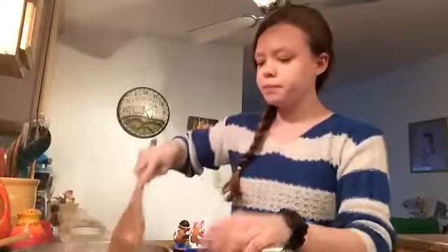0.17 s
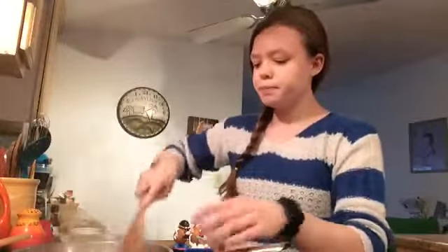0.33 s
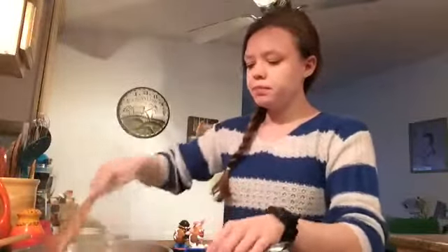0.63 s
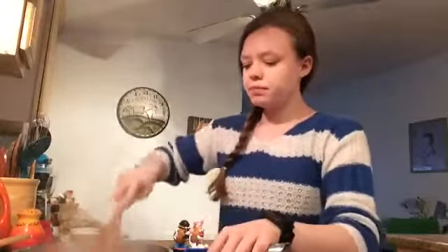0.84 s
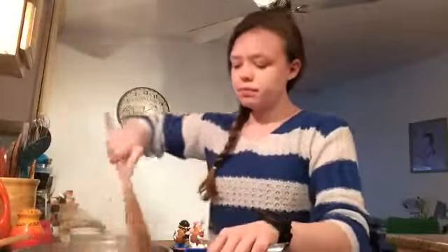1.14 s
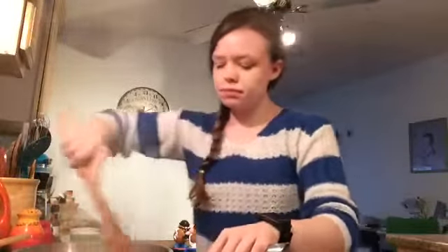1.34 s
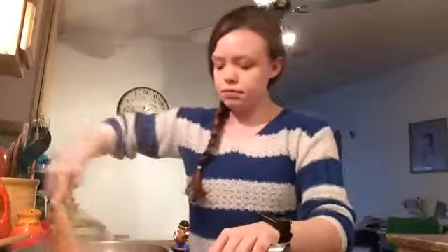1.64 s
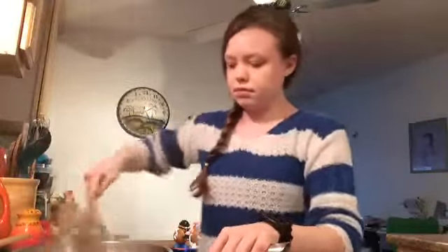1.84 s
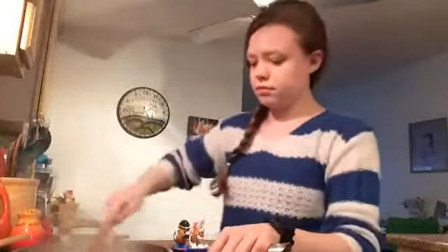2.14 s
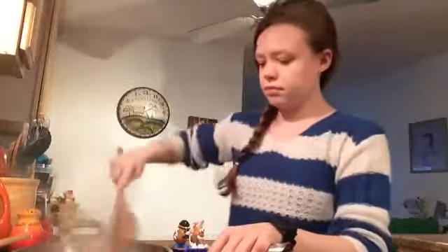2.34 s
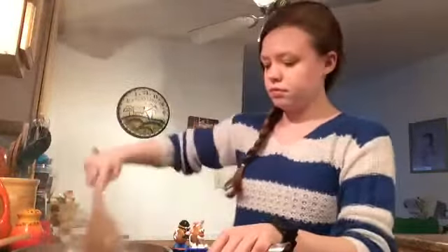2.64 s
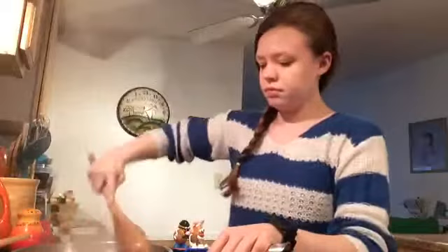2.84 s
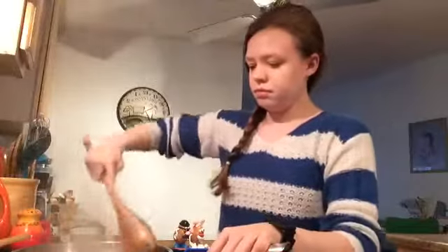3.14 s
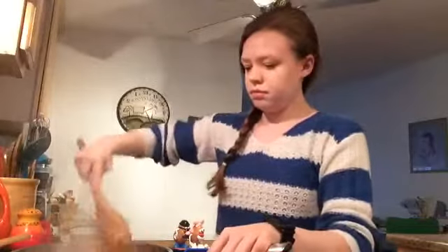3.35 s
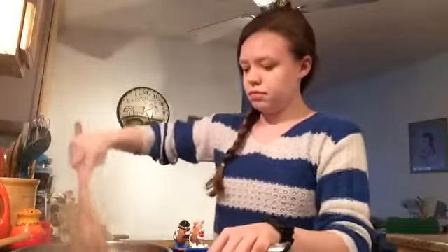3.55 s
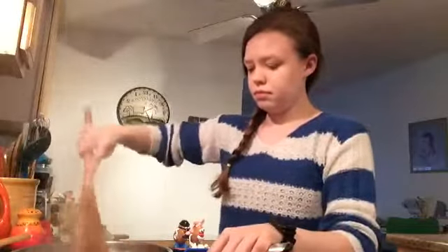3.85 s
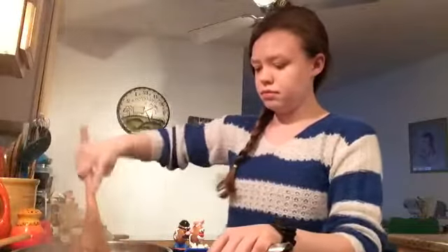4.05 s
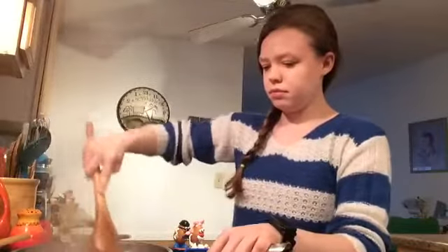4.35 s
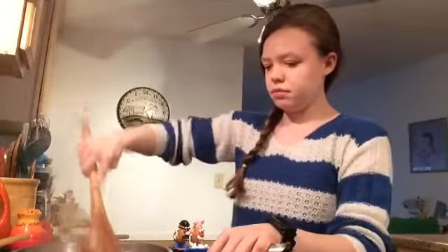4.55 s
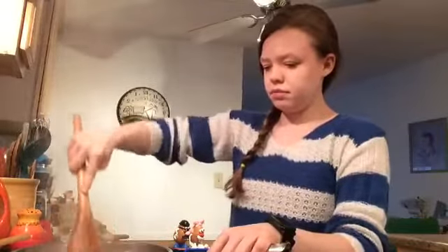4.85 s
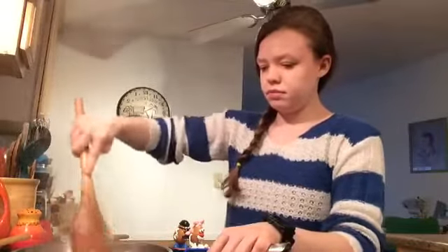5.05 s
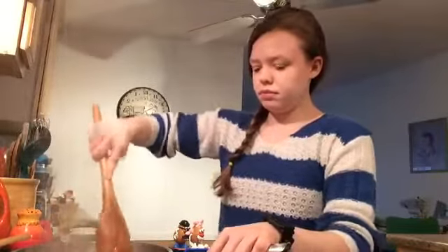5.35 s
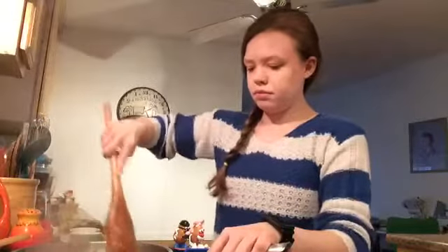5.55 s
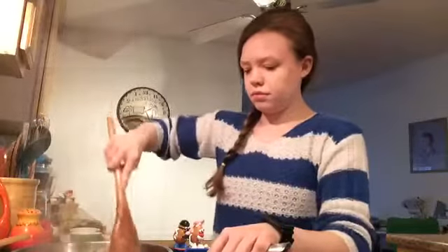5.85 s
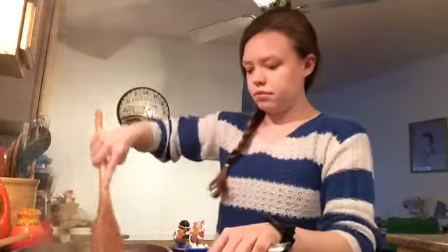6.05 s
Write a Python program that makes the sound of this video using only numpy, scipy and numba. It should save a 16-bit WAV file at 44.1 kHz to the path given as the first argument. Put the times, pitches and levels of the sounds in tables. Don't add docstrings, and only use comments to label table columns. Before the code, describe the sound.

Irregular wooden clacks on a damped metal pan, moist meat being pushed around, a short scraping squeak midway, and a soft kitchen fan throughout.

```python
import sys
import numpy as np
from scipy import signal
from scipy.fft import rfft, irfft, next_fast_len
from scipy.io import wavfile
from scipy.ndimage import uniform_filter1d
from numba import njit

SR = 44100
rng = np.random.default_rng(int(sys.argv[2]) if len(sys.argv) > 2 else 0)


def undo_db(level):
    steps = np.asarray(level, float) / 20
    return 10 ** steps


def dump(signal):
    limited = np.clip(np.atleast_2d(signal).T, -1, 1)
    pcm = np.round(limited * 32767).astype(np.int16)
    wavfile.write(sys.argv[1], SR, pcm)


N = 274169
TIME = np.arange(N) / SR

# f/Hz, density level/dB
FAN_SPECTRUM = [(30, -55), (85, -35), (125, -3), (200, -4.5), (300, -8.5), (520, -10.5), (700, -9.5),
                (1440, -9), (1920, -15), (4000, -18.5), (7300, -20.5), (10000, -21), (13000, -29.5),
                (15600, -33)]
# f/Hz, level/dB, T60/s
ROOM_BANDS = [(200, -8.5, 0.33), (500, -13, 0.3), (1200, -14, 0.24), (2530, -9, 0.32), (6000, -16, 0.5)]
# centre t/s, level/dB, f/Hz, length/s, glide ratio/1
CHIRPS = [(0.011, -53, 1536, 0.039, 1.0), (.012, -53, 900, 0.043, 1.06), (.79, -47, 591, 0.039, 1.0),
          (.792, -47, 2480, 0.01, 1.0), (.815, -58, 2500, .014, 1.16), (2.037, -55.5, 3250, 0.0074, 1.0),
          (3.547, -50.5, 2605, 0.029, 1.0), (3.975, -54, 1390, 0.014, 0.99), (4.006, -55, 1300, .01, 1.05),
          (4.018, -52, 1480, 0.014, 1.1), (4.028, -53, 1760, 0.017, 1.01), (3.44, -55, 2475, .05, 1.1),
          (3.5, -57, 3300, .04, 1.02), (3.64, -57, 2760, .06, 1.05), (4.267, -44, 1223, 0.012, 0.97),
          (5.503, -54, 1050, .012, 1.0), (5.57, -57, 950, .012, 1.0), (5.655, -56, 1250, .014, 1.0),
          (5.67, -56, 1700, .012, 1.0), (4.336, -47, 1138, 0.019, 1.16), (6.21, -59, 990, 0.014, 1.0)]
# centre t/s, level/dB, f/Hz, bandwidth/Hz, length/s
RASPS = [(.02, -64.5, 4700, 900, 0.073), (0.357, -58.5, 1530, 350, 0.082), (0.797, -70, 11800, 6000, 0.053),
         (3.472, -53.5, 3000, 4000, .1), (3.6, -58, 3170, 1800, .13), (5.51, -62, 400, 300, .04),
         (2.3, -64, 1300, 900, .06), (3.96, -66, 9000, 8000, 0.085), (4.04, -61.5, 3760, 600, 0.13),
         (4.153, -58.5, 4420, 800, 0.097), (4.295, -55.5, 4650, 900, 0.09), (4.559, -56.5, 3566, 900, .07),
         (5.095, -59.5, 2940, 2000, .03), (5.175, -71, 4600, 700, .06), (5.5, -60, 1400, 1800, 0.0124),
         (5.678, -66, 1400, 600, 0.0714), (4.948, -66, 7600, 800, .05), (3.162, -63, 4600, 900, 0.078)]
# t/s, slip rate f/Hz, level/dB
SQUEAK_STRANDS = [
    [(3.6, 880, -13), (3.635, 915, -7), (3.66, 935, -8), (3.71, 945, -13)],
    [(3.7, 990, -8), (3.715, 1000, -3), (3.735, 1018, -5), (3.755, 1004, 0), (3.8, 1012, -1),
     (3.86, 1006, -7), (3.89, 1000, -4), (3.93, 966, -3), (3.965, 950, -12)],
    [(3.79, 1062, -10), (3.815, 1083, 1), (3.845, 1084, 0), (3.885, 1096, -4), (3.915, 1075, -11)],
]
# f/Hz, level/dB
EDGE_RESPONSE = [(1000, -19), (2100, -12), (3100, -9), (4200, -2), (5200, -9.5), (6200, -9), (7200, -18),
                 (9000, -16.5), (11000, -31), (14000, -36)]
# t/s, hiss level/dB, drag level/dB, time to fall 20 dB/s
PLUNGES = [
    (0.0, -62.5, -55, 0.23),
    (.246, -51.5, -47.5, 0.06),
    (2.39, -65.5, -59.5, 0.43),
    (3.05, -62.5, -56, 0.47),
    (3.413, -52, -53, 0.3),
    (4.24, -56.5, -54.5, .24),
    (4.517, -55, -53, .17),
    (4.782, -46, -47, .15),
    (5.08, -62, -54.5, .12),
    (5.8, -54.5, -50, 0.11),
]
# centre t/s, hiss level/dB, drag level/dB, length/s
PUSHES = [(.35, -65, -59, 0.17), (.66, -66.5, -69, .1), (0.743, -71, -59, 0.082), (.797, -59, -57, 0.082),
          (1.517, -68.5, -69, .14), (1.332, -69.5, -67, 0.31), (1.676, -67, -64.5, 0.19),
          (1.895, -69, -70.5, .1), (2.06, -64.5, -61.5, .24), (2.854, -67.5, -59, .12),
          (2.977, -67, -67, 0.12), (3.152, -57.5, -62, .14), (3.483, -60, -53, .1),
          (3.59, -70, -56.5, 0.21), (3.78, -70, -73, .3), (4.0, -59.5, -68, 0.21), (4.17, -63, -68, 0.19),
          (4.7, -69, -70.5, 0.19), (5.184, -65.5, -64.5, 0.18), (4.98, -67, -72, 0.14),
          (5.25, -67, -64, .14), (5.42, -66.5, -70, .3), (5.643, -62, -56, 0.21), (6.053, -62, -57.5, 0.12)]
# f/Hz, density level/dB
SQUELCH_SPECTRUM = [(300, -21), (1000, -8), (2500, -1), (5000, -2.5), (8000, -4), (10500, -11.5),
                    (12500, -17.5), (15500, -30)]
# f/Hz, density level/dB
DRAG_SPECTRUM = [(100, -9.5), (250, -4.5), (600, -3), (900, 0), (1500, -2.5), (2200, -11.5), (3500, -18),
                 (7000, -47), (15500, -70)]
# t/s, peak level/dB, spoon f/Hz, thud f/Hz, treble level/dB
KNOCKS = [(.269, -31, 730, 411, -13.5), (.666, -54, 210, 190, -10), (1.284, -57, 500, 200, -18),
          (1.307, -45.5, 500, 422, -27), (1.317, -48, 500, 254, -25), (1.962, -38.5, 700, 290, -16),
          (2.413, -30, 834, 296, -16.5), (2.807, -34, 596, 263, -34), (3.103, -22.5, 1100, 429, -9.5),
          (3.5661, -19.5, 1360, 252, -13.5), (3.948, -35, 900, 250, -11), (4.532, -40, 532, 210, -14),
          (4.8173, -16, 814, 320, -6.5), (5.374, -30, 1200, 378, -27), (5.588, -35.5, 1200, 320, -8),
          (5.8151, -13.5, 1400, 290, -10), (6.042, -53, 1150, 260, 2.5)]
# f/Hz, level/dB, T60/s
PAN_MODES = [(188, -5.5, 0.48), (270.3, -2, .1), (320, -3.5, 0.18), (423.5, -2, 0.055), (564, -18, 0.18),
             (722, -10, 0.1), (845, -6.5, 0.033), (958.5, -24, 0.051), (1187, -3, 0.026), (1430, -4, 0.032),
             (1600, -12.5, 0.039), (1748, 0, 0.026), (1803, -11, 0.0333), (2105, -14.5, 0.06),
             (2290, -34, 0.095), (2440, -16, 0.039), (2716, -22, 0.062), (3120, -23, 0.023)]
# t/s, f/Hz, level/dB, T60/s
FREE_RINGS = [(3.103, 188, -30, 0.18), (3.103, 427, -21.5, .085), (4.819, 199, -29, 0.11),
              (4.817, 285, -30, .07), (5.815, 188, -35, 0.16), (2.807, 180, -37, 0.16),
              (5.375, 300, -37, .08), (3.949, 200, -44, .12), (3.568, 330, -33, .09),
              (5.816, 2050, -30, .04), (.667, 173, -48, 0.11), (3.103, 560, -35, .1),
              (3.108, 721, -26, 0.12), (3.104, 1550, -32, .06), (3.103, 380, -30, .06),
              (3.103, 280, -29, .14), (3.104, 1180, -29, 0.045), (3.103, 2764, -39, 0.065),
              (4.818, 764, -27, 0.045), (4.817, 2440, -32, 0.025), (5.815, 2950, -36, .02),
              (5.374, 760, -36, .025), (5.588, 800, -44, .03), (5.82, 1600, -36, 0.15),
              (5.82, 851, -42, 0.15), (2.414, 1850, -44, 0.02)]
# f/Hz, level/dB, T60/s
HOB_MODE = (140, -17, .12)
# level/dB, T60/s at 200 Hz, T60/s at 3 kHz
SHUDDER_DECAY = (-20, 0.12, 0.04)

FAN_DB, HUM_HZ, HUM_DB = -63.5, 121.3, -74.5
WALL_S, WALL_DB = .021, -12
ROOM_BUILD_S = .012
SQUEAK_DB = -53
PLUNGE_ATTACK_S = 0.0041
REST_HISS_DB, REST_DRAG_DB = -72, -69
SQUELCH_HZ, SQUELCH_SAG_HZ_PER_DB = 4000, 31
CONTACT_S = .00025
THUD_SAG, THUD_SAG_S = .2, .006
DAMPED_T60_S = .06
MID_KNOCK_DB, MID_KNOCK_HZ = -35, 800
THUD_DB, THUD_PER_DB, THUD_DB_PER_OCTAVE = -4.5, -.5, -4
MID_DB, MID_DB_PER_OCTAVE = -4.5, -8


def level(x, db):
    return x * undo_db(db) / np.sqrt(np.mean(x ** 2))


def colour(x, points):
    hz, db = np.transpose(points)
    n = next_fast_len(len(x))
    log_hz = np.log(np.fft.rfftfreq(n, 1 / SR) + 1)
    gain = undo_db(np.interp(log_hz, np.log(hz), db))
    return irfft(rfft(x, n) * gain, n)[:len(x)]


def walk(rate):
    hold = int(SR / rate)
    steps = np.repeat(rng.standard_normal(N // hold + 1), hold)
    return 1.23 * uniform_filter1d(uniform_filter1d(steps, hold), hold)[:N]


def curve(table):
    s, *columns = np.transpose(table)
    return [np.interp(TIME, s, c) for c in columns]


def grains(rate, spread_db):
    size = undo_db(spread_db * np.minimum(rng.exponential(size=N), 3))
    pops = (rng.random(N) < rate / SR) * size
    return rng.standard_normal(N) * (1 + signal.lfilter([1], [1, -.95], pops))


@njit
def svf(x, hz, width):
    y, b, l = np.empty(len(x)), 0., 0.
    for i in range(len(x)):
        g, k = np.tan(np.pi * hz[i] / SR), width[i] / hz[i]
        v = (b + g * (x[i] - l)) / (1 + g * (g + k))
        b, l, y[i] = 2 * v - b, l + 2 * g * v, k * v
    return y


def ring(t, hz, t60):
    return np.sin(2 * np.pi * hz * t) * np.exp(-np.log(1000) * t / t60)


def around(s, length):
    return slice(max(int((s - 2 * length) * SR), 0), int((s + 2 * length) * SR))


def kitchen():
    rush = level(colour(grains(300, 1.5), FAN_SPECTRUM), FAN_DB - 3) * undo_db(.7 * walk(3))
    hum = np.sqrt(2) * undo_db(HUM_DB + 0.9 * walk(2.5)) * np.sin(2 * np.pi * HUM_HZ * TIME)
    return rush + hum


def room(x):
    t = np.arange(SR // 2) / SR
    tail, echoes = np.zeros(len(t)), rng.standard_normal(len(t))
    for size in (512, 256, 512, 256):
        cells = signal.stft(echoes, nperseg=size)[2]
        echoes = signal.istft(cells / np.abs(cells), nperseg=size)[1][:len(t)]
    build = 1 - np.exp(-(t / ROOM_BUILD_S) ** 2)
    for hz, db, t60 in ROOM_BANDS:
        band = svf(echoes, hz + 0 * t, hz + 0 * t) * np.exp(-np.log(1000) * t / t60) * build
        tail += undo_db(db) * band / np.sqrt(np.sum(band ** 2)) * np.sqrt(3 * hz / SR)
    tail[0] = 1
    tail[int(WALL_S * SR)] += undo_db(WALL_DB)
    return signal.fftconvolve(x, tail)[:N]


def rasps():
    out = np.zeros(N)
    for s, db, hz, width, length in RASPS:
        near = around(s, length)
        u = (TIME[near] - s) / length
        centre, span = hz + 0 * u, width + 0 * u
        band = svf(svf(rng.standard_normal(len(u)), centre, span), centre, span)
        out[near] += level(band, db) * np.exp(-4 * u ** 2)
    return out


def chirps():
    out, waver = np.zeros(N), undo_db(1.5 * walk(200))
    for s, db, hz, length, glide in CHIRPS:
        near = around(s, length)
        u = (TIME[near] - s) / length
        cycles = hz * length * (u + (glide - 1) * u ** 2 / 2)
        out[near] += undo_db(db) * np.exp(-4 * u ** 2) * np.sin(2 * np.pi * cycles)
    return out * waver


def squeak():
    out, (edge_hz, edge_db) = np.zeros(N), np.transpose(EDGE_RESPONSE)
    for strand in SQUEAK_STRANDS:
        on = slice(int(strand[0][0] * SR), int(strand[-1][0] * SR))
        hz, db = (c[on] for c in curve(strand))
        phase = np.cumsum(hz * (1 + .01 * walk(400)[on])) / SR
        fade = signal.windows.tukey(len(hz), .15)
        for k in range(1, 14):
            grip_db = 3 * uniform_filter1d(rng.standard_normal(len(hz)), 300) * np.sqrt(300)
            harmonic_db = SQUEAK_DB + db + np.interp(k * hz, edge_hz, edge_db) + grip_db
            out[on] += undo_db(harmonic_db) * np.cos(2 * np.pi * k * phase) * fade
    return out


def strokes():
    gain = undo_db(np.array([[REST_HISS_DB], [REST_DRAG_DB]])) + 0 * TIME
    for s, hiss_db, drag_db, fall in PLUNGES:
        u = np.maximum(TIME - s, 0)
        decay = undo_db(np.array([[hiss_db], [drag_db]]) - 20 * u / fall)
        gain = np.hypot(gain, decay * (1 - np.exp(-u / PLUNGE_ATTACK_S)))
    for s, hiss_db, drag_db, length in PUSHES:
        swell = np.exp(-4 * ((TIME - s) / length) ** 2)
        gain = np.hypot(gain, undo_db(np.array([[hiss_db], [drag_db]])) * swell)
    return gain


def stirring():
    hiss, pull = strokes()
    wet = grains(900, 0.66)
    pull_db = 20 * np.log10(pull) - REST_DRAG_DB
    centre_hz = np.clip(SQUELCH_HZ - SQUELCH_SAG_HZ_PER_DB * pull_db, 1500, 9000)
    resonance = level(svf(wet, centre_hz, centre_hz / 2.6), 0)
    squelch = level(colour(wet, SQUELCH_SPECTRUM), 0) + 0.23 * resonance
    drag = level(colour(grains(300, 2.0), DRAG_SPECTRUM), -0.48)
    return level(squelch, -0.77) * hiss * undo_db(2.0 * walk(30)) + drag * pull * undo_db(1.92 * walk(24.96))


def shudder(t, thud_db, mid_db, treble_db, count=120):
    place = (np.arange(count)[:, None] + rng.random((count, 1))) / count
    hz = 150 * 2 ** (4.6 * place)
    levels_db = [thud_db, mid_db, treble_db, treble_db - 11.5]
    tilt_db = np.interp(np.log(hz), np.log([350, 800, 1800, 3600]), levels_db)
    t60 = np.interp(np.log(hz), np.log([200, 3000]), SHUDDER_DECAY[1:])
    strength = rng.standard_normal((count, 1)) * undo_db(SHUDDER_DECAY[0] + tilt_db)
    return np.sum(strength * ring(t, hz, t60), axis=0)


def knocks():
    out, t = np.zeros(N + SR), np.arange(SR // 5) / SR
    hz, db, t60 = np.transpose(PAN_MODES)[:, :, None]
    damped_t60 = np.minimum(t60, DAMPED_T60_S)
    chance = rng.standard_normal((len(KNOCKS), 2, len(PAN_MODES), 1))
    hob_hz, hob_db, hob_t60 = HOB_MODE
    hob = undo_db(hob_db) * ring(t, hob_hz, hob_t60) * (1 - np.exp(-t / 0.003))
    sagging_t = t + THUD_SAG * THUD_SAG_S * (1 - np.exp(-t / THUD_SAG_S))
    contact = 1 - np.exp(-(t / CONTACT_S) ** 2)
    for (s, peak_db, wood_hz, thud_hz, treble_db), (place, detune) in zip(KNOCKS, chance):
        octaves = np.log2(wood_hz / MID_KNOCK_HZ)
        thud_db = THUD_DB + THUD_PER_DB * (peak_db - MID_KNOCK_DB) + THUD_DB_PER_OCTAVE * octaves
        mid_db = MID_DB + MID_DB_PER_OCTAVE * max(octaves, 0)
        tilt_db = np.interp(np.log(hz), np.log([350, 800, 1800]), [thud_db, mid_db, treble_db])
        strength = np.sign(place) * undo_db(db + tilt_db + 2.9 * place)
        pan = np.sum(strength * ring(t, hz * (1 + 0.045 * detune), damped_t60), axis=0)
        wood = undo_db(5) * ring(t, wood_hz, 0.0083) + undo_db(treble_db - 4.5) * ring(t, 2310, 0.012)
        thud = -undo_db(thud_db + 5.5) * ring(sagging_t, thud_hz, 0.045) * (1 - np.exp(-t / 0.001))
        thud += undo_db(0.41 * thud_db) * hob
        blow = undo_db(-5) * pan + shudder(t, thud_db, mid_db, treble_db) - wood + thud
        i = int(s * SR)
        out[i:i + len(t)] += undo_db(peak_db) * blow * contact
    for s, hz, db, t60 in FREE_RINGS:
        i = int(s * SR)
        out[i:i + len(t)] += undo_db(db) * ring(t, hz, t60) * (1 - np.exp(-t / 0.0022))
    return out[:N]


def scene():
    at_pan = knocks() + stirring() + squeak() + chirps() + rasps()
    return (room(at_pan) + kitchen())[None]


def low_pass(x):
    return signal.sosfilt(signal.butter(12, 15770, fs=SR, output="sos"), x)


def record(dry):
    x = signal.sosfilt(signal.butter(3, 115, "high", fs=SR, output="sos"), dry)
    x = signal.sosfilt(signal.ellip(8, .3, 60, 15800, fs=SR, output="sos"), x)
    return low_pass(x)


dry = scene()
out = record(dry)
dump(out)
```